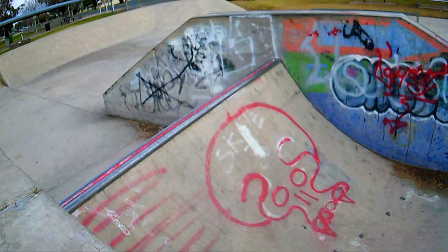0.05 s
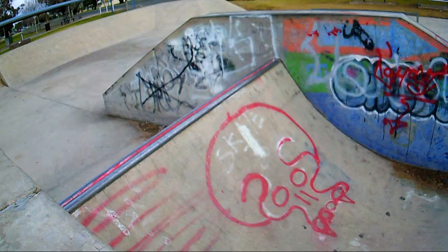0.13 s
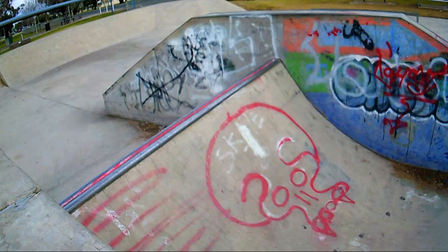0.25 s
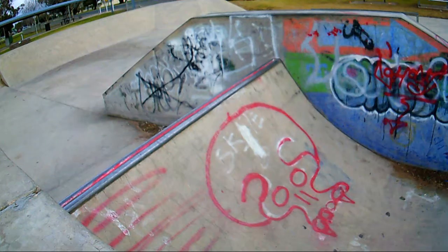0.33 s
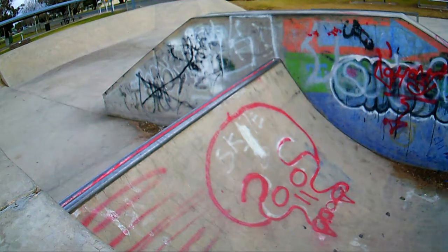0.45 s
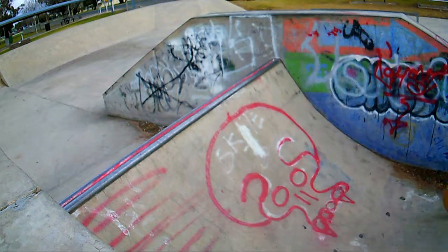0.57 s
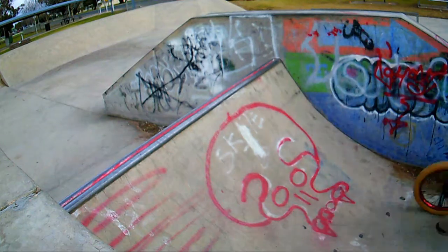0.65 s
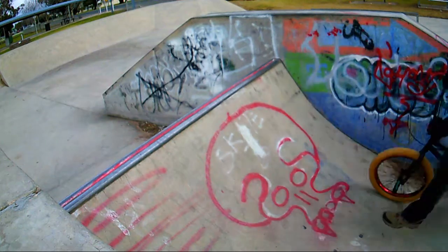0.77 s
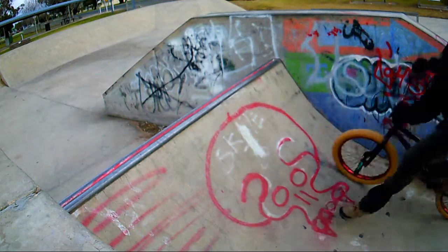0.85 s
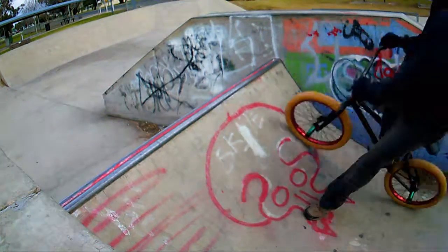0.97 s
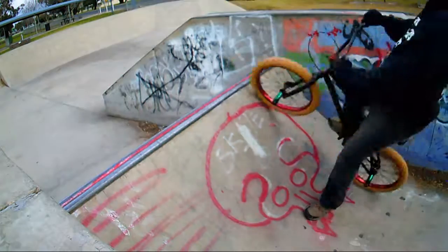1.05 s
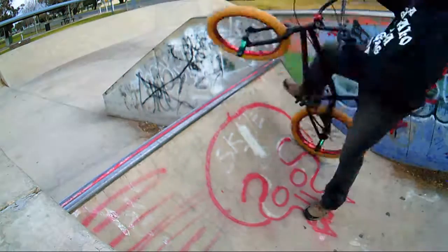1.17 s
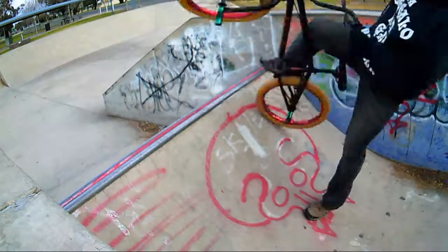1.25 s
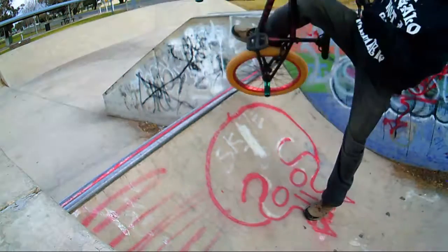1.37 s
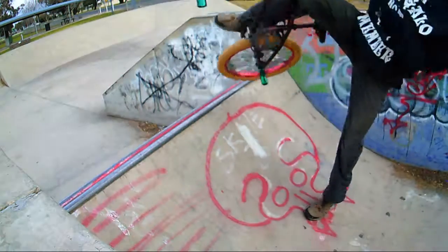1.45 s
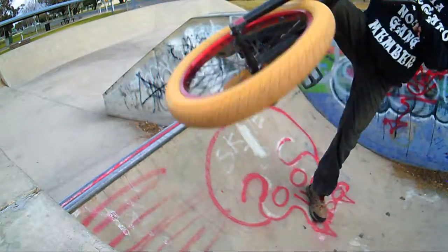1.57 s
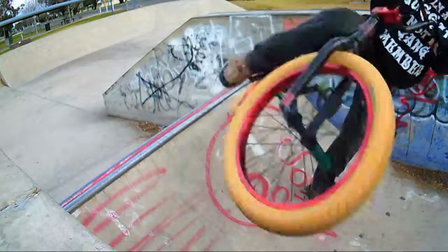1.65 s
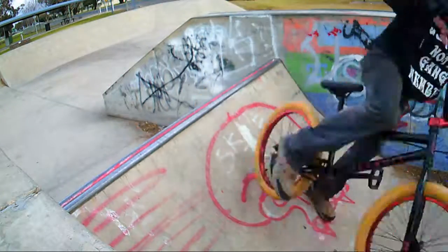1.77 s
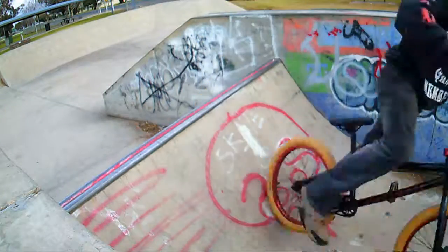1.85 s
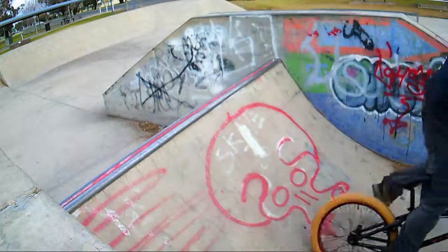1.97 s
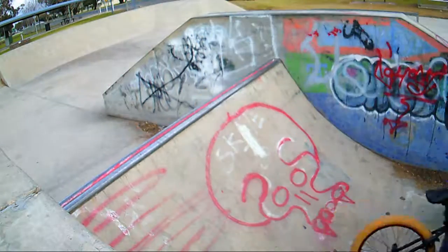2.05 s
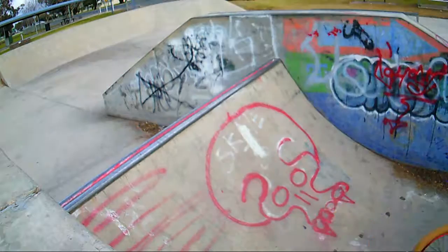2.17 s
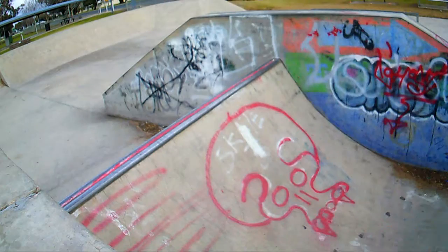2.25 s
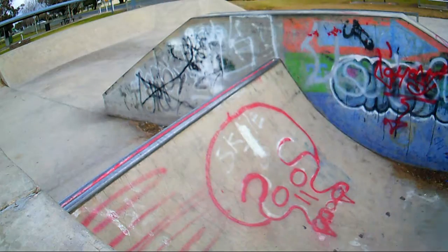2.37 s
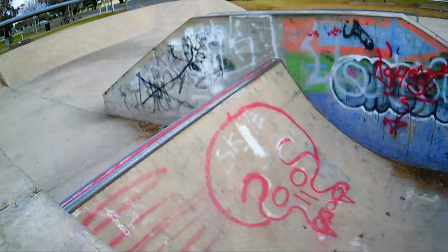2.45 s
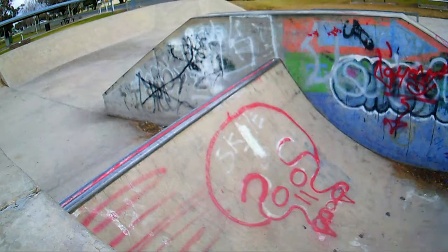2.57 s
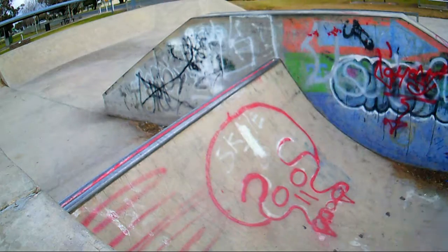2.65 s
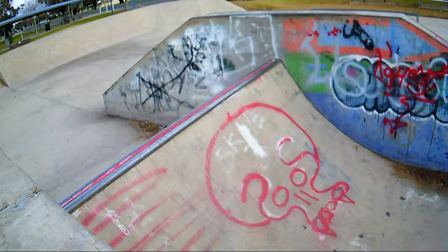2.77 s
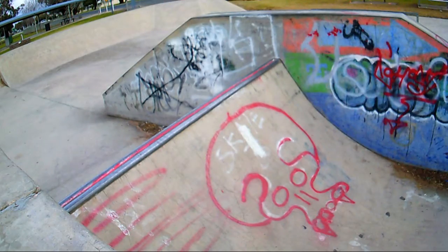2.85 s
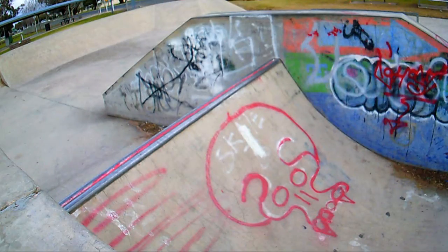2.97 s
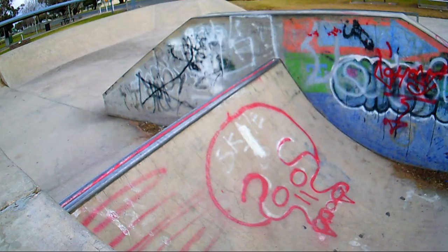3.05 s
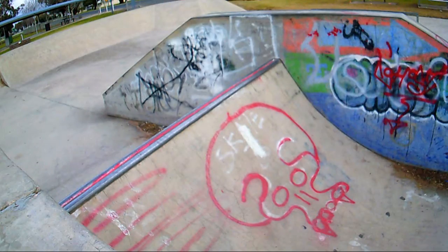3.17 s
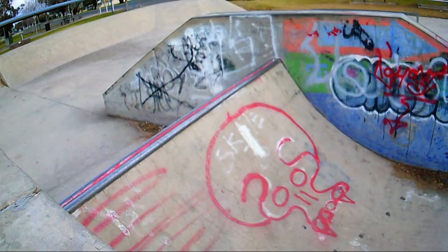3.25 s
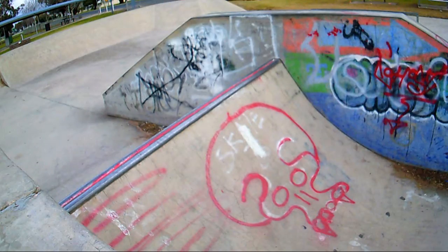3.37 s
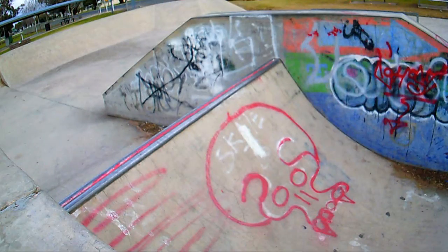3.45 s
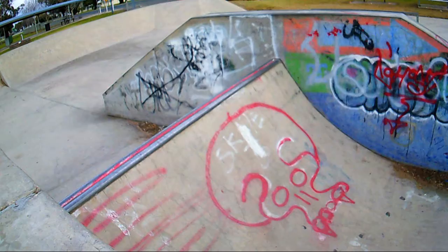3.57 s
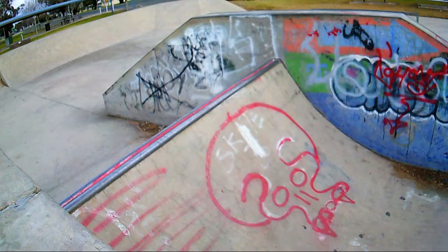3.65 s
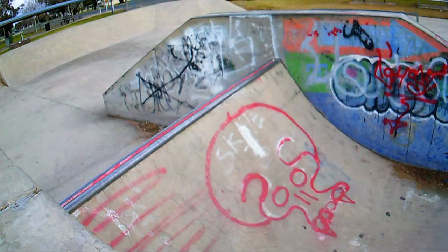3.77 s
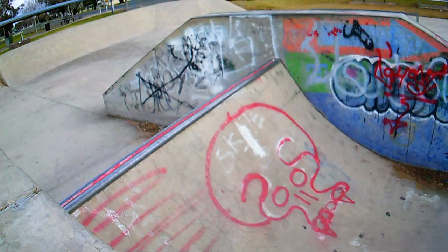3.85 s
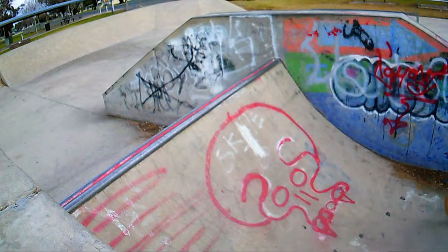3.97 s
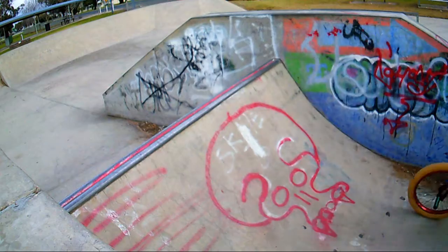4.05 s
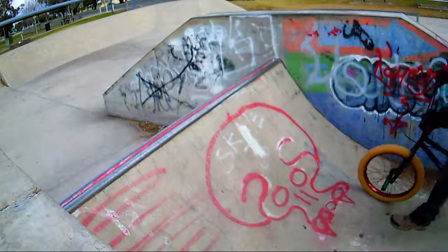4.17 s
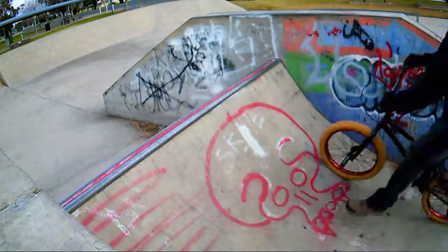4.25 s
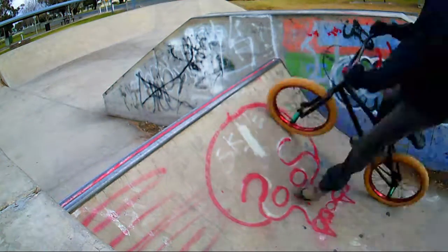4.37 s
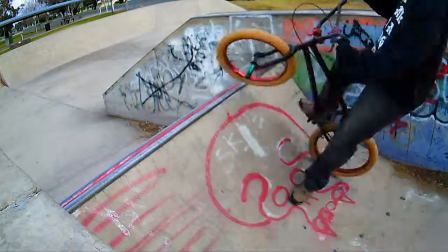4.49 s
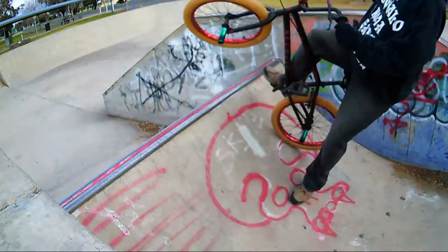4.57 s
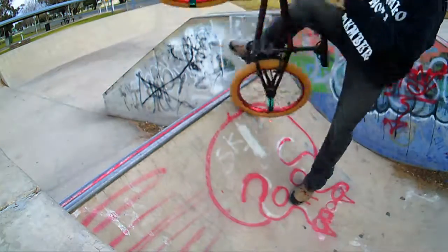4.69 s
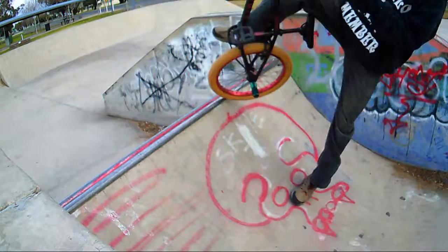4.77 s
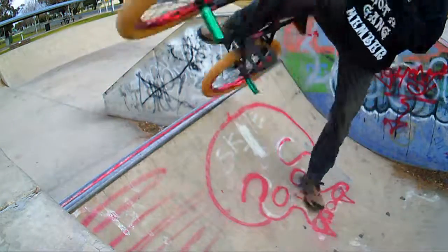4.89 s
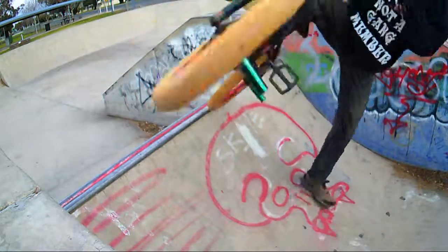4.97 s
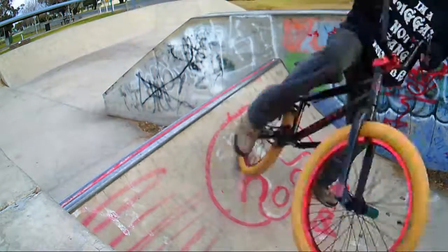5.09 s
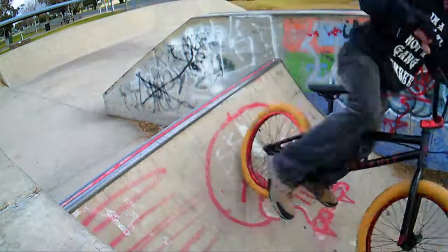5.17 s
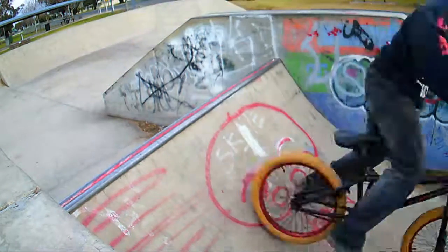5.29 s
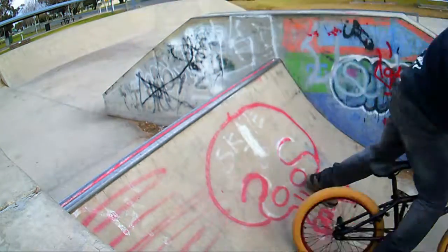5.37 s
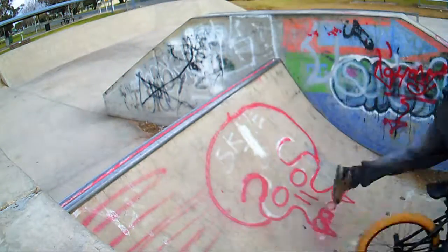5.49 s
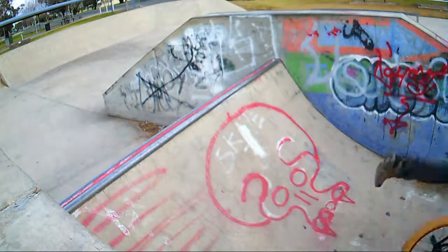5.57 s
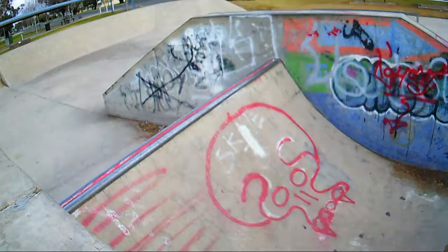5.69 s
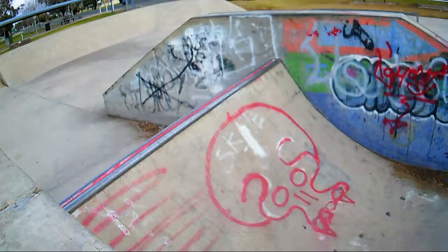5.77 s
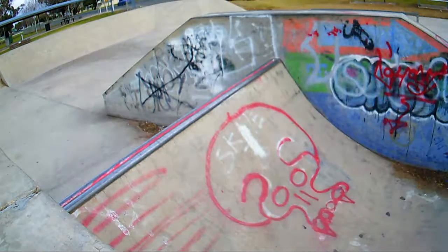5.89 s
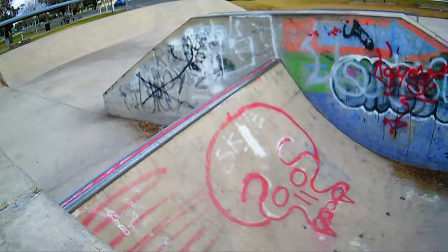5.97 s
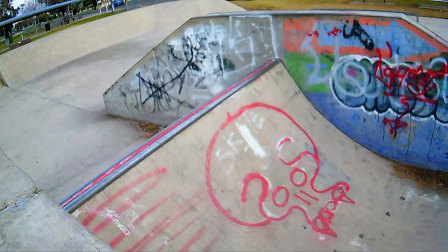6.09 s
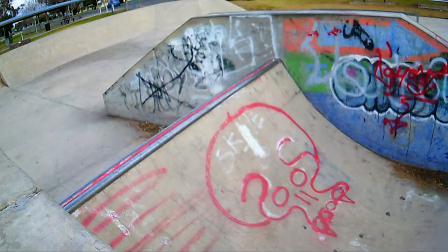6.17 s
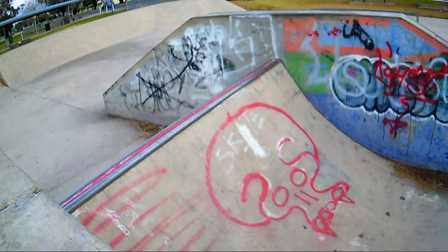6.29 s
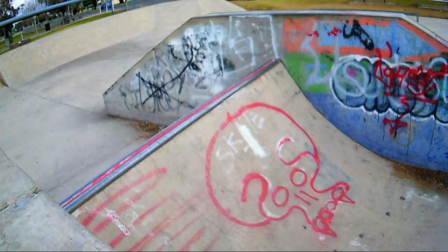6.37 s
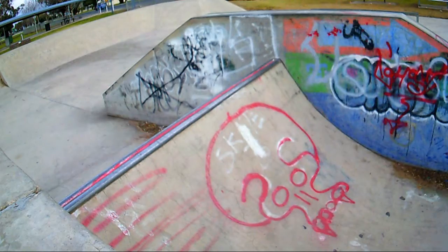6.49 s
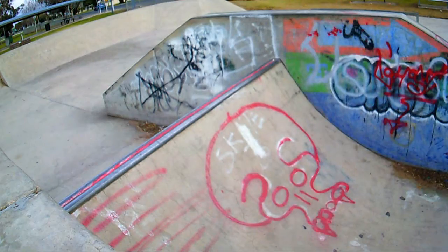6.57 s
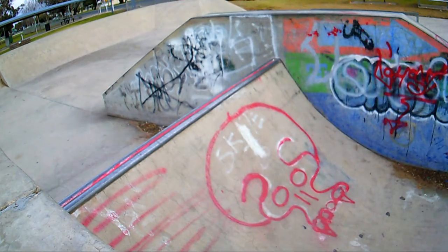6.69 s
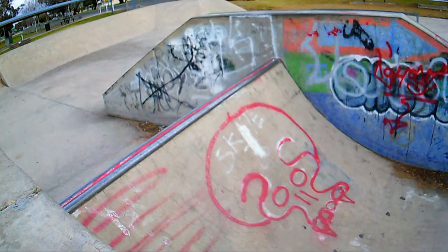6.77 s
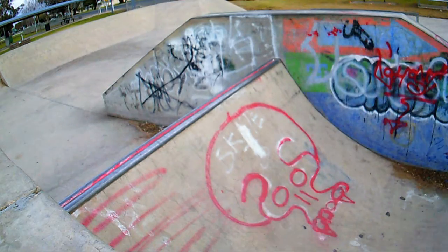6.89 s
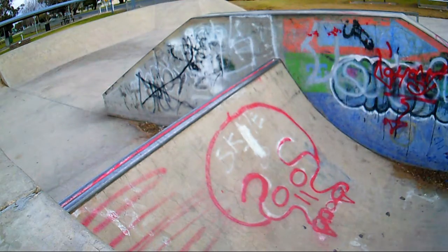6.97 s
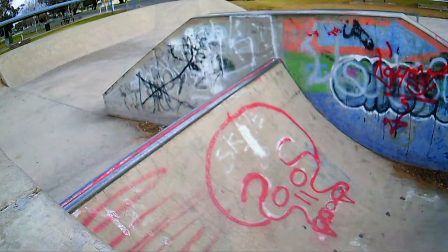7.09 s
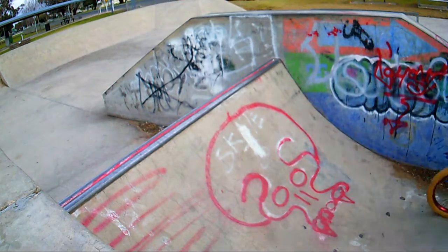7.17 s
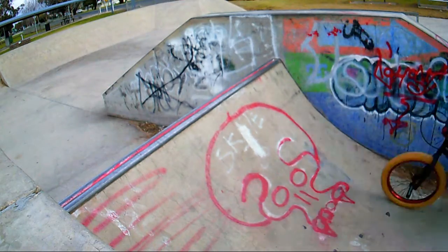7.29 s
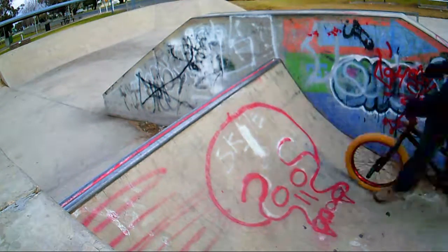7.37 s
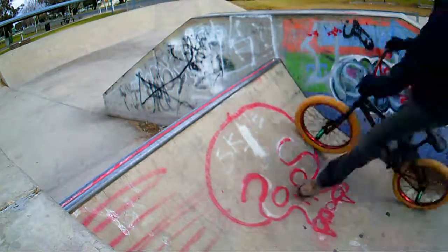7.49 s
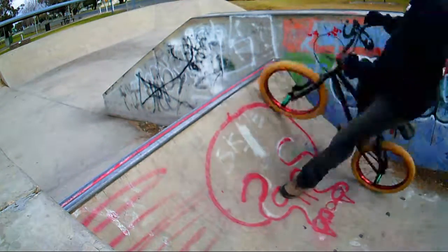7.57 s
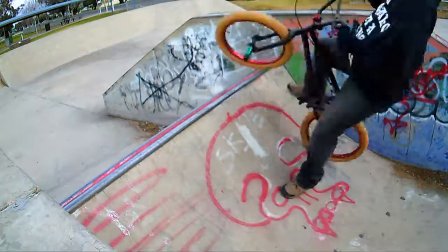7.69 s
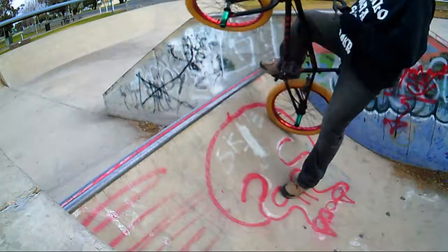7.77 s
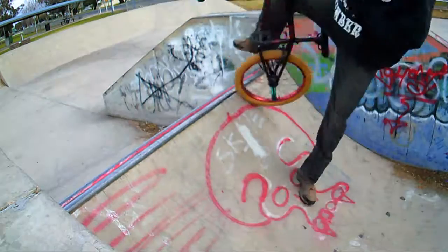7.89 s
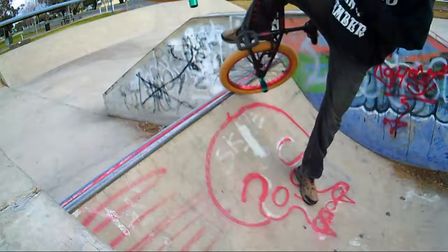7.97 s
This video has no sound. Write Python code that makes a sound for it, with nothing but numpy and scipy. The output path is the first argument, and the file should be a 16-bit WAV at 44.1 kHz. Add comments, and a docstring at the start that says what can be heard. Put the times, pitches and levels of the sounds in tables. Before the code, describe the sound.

A low hum of distant traffic and engines runs throughout. Close by, BMX tyres rush in on concrete at about 0.7 seconds, the freewheel ticking faster. A shoe slaps and scuffs the ramp around 1 second, and the ticking slows with the wheel in the air. Near 1.9 seconds the bike lands with booming tyres and a rattling frame and chain, gives a hard double clack at 2.2, and coasts away. At 3.1 the road is abruptly louder, an engine droning and climbing until about 5.3. The bike returns at 4.2, with dull foot knocks from 4.4 to 5, then lands with a rattle and boom between 5.1 and 5.4 and ticks away. The road hum drops at 6.6. A third approach at 7.4 brings a shoe slap, a faint squeak and a short foot thud near 7.9. The concrete bowl gives the bike a brief echo.

```python
"""Over a low road hum, BMX tyres rush in on concrete and a freewheel ticks faster: three tries at a foot plant.
Each time a shoe slaps and scuffs the ramp while the ticking slows with the wheel in the air. Twice the bike
lands, its frame rattling and its tyres booming, and coasts away; the third try ends on a short foot thud. The
concrete bowl gives the bike a brief echo. Engines pull away on the road behind; the background steps up
abruptly at 3.1 s and down again at 6.6 s."""
import sys
import numpy as np
from scipy import signal
from scipy.fft import rfft, irfft, next_fast_len
from scipy.io import wavfile
from scipy.ndimage import uniform_filter1d, map_coordinates

SR = 44100
rng = np.random.default_rng(int(sys.argv[2]) if len(sys.argv) > 2 else 0)


def unload_audio(sound):
    """Save the sound as a 16-bit wav file, at the path given as the first command line argument."""
    columns = np.transpose(np.atleast_2d(sound))
    # keep every value between -1 and 1, then stretch to whole-number steps
    steps = np.round(np.clip(columns, -1, 1) * 32767)
    wavfile.write(sys.argv[1], SR, steps.astype(np.int16))


N = 354563
TIME = np.arange(N) / SR
HIT_TIME = TIME[:SR // 2]

# A wheel comes down: start_s, level_db, slam_offset_db, brightness_db,
# rebound_gap_s, rebound_count, loss_per_rebound_db
WHEEL_DROPS = [(1.8541, -30, 0, 1, 0.043, 1, 2.5), (1.9484, -24, -4, -0.5, 0.03, 2, 6),
               (5.127, -31.5, -4, -0.5, .045, 2, 12), (5.352, -24, -10, -.5, 0.034, 3, 5)]
def landings(slam_delay_s=.007):
    """The tyre touches, the frame slams and shudders on, and the bike rebounds, weaker each time."""
    # tone of each stage: thud_db, body_db, snap_db, steel_db
    touch, slam = [-5.5, -1, -17, -34.5], [2.5, -0.5, -9.5, -33.5]
    shudder, rebound = [-5, -15, -27.5, -43.5], [3, 1.5, -10, -28]
    out = np.zeros(N)
    for start_s, level_db, slam_db, bright_db, gap_s, count, loss_db in WHEEL_DROPS:
        band_db = level_db + np.array([0, 0, bright_db, bright_db])
        add(out, start_s, blow(band_db + touch, t60_s=.11, crack=10))
        add(out, start_s + slam_delay_s, blow(band_db + slam_db + slam, t60_s=.1))
        add(out, start_s + slam_delay_s, blow(band_db + shudder, t60_s=.44, ring_db=1))
        for k in range(1, round(count) + 1):
            add(out, start_s + k * gap_s, blow(band_db - k * loss_db + rebound, t60_s=.1))
    return out


# The thud, body, snap and loose steel of a blow: low_hz, high_hz
BLOW_BANDS = [(130, 450), (450, 1800), (1800, 4200), (4800, 13000)]
# Tone of the shaken frame: frequency_hz, gain_db
FRAME_EQ = [(100, -6.5), (170, 0.5), (235, -2), (345, 2), (470, -4.5), (590, 2), (690, -1), (810, 2.5),
            (1300, -4), (1900, -20), (2500, -23), (3700, -35.5), (6000, -43.5), (13000, -54.5)]
# Ringing spokes, chain and frame tubes: pitch_hz, level_db, t60_s
STEEL_MODES = [(2330, 1.5, .12), (2760, 5, 0.12), (3150, -1.5, .13), (3160, 0.5, 0.12), (3560, 2, 0.086),
               (3820, 5, 0.088), (5540, -11.5, .14), (5930, -13.5, .14), (6300, -15, .14)]
def blow(band_db, t60_s, crack=8, ring_db=0):
    """A sharp contact, then a dying chatter of loose parts through the frame; one level per band."""
    clumps = amp(3 * np.repeat(rng.standard_normal(len(HIT_TIME) // 63), 63))  # tiny rebounds
    force = rng.standard_normal(len(HIT_TIME)) * clumps * decay(HIT_TIME, t60_s)
    force[0] += crack
    shake = colour(force, FRAME_EQ)
    out = np.zeros(len(HIT_TIME))
    for band_hz, level_db in zip(BLOW_BANDS, band_db):
        part = signal.sosfilt(signal.butter(3, band_hz, 'band', fs=SR, output='sos'), shake)
        out += amp(level_db) * part / np.std(part[:SR // 40])  # the first 25 ms set the level
    add(out, 0, amp(band_db[-1] + ring_db) * ring(STEEL_MODES, scatter_db=1))
    return out


# Tyres on landing, and a short foot thud at the end: start_s, level_db, pitch_hz, t60_s
LOW_BOOMS = [(1.861, -25, 99, .28), (1.958, -15.5, 172.5, 0.12), (1.987, -15.5, 95.6, 0.42),
             (2.195, -23.5, 88, 0.23), (5.366, -18.5, 107, 0.13), (5.388, -15.5, 99, 0.62),
             (7.931, -24.5, 214, 0.091)]
def booms(attack_s=.0013):
    """Each impact rings one low, dying tone, like a slack drum."""
    out = np.zeros(N)
    for start_s, level_db, pitch_hz, t60_s in LOW_BOOMS:
        envelope = fade_in(HIT_TIME, attack_s) * decay(HIT_TIME, t60_s)
        add(out, start_s, amp(level_db) * envelope * np.sin(2 * np.pi * pitch_hz * HIT_TIME))
    return out


# A hard double clack as the bike rolls away: start_s, level_db, lowpass_hz
CLACK_HITS = [(2.1745, -14, 800), (2.1899, -11, 1800), (2.1918, -16.5, 2100)]
# The short ring of a clack: pitch_hz, level_db, t60_s
CLACK_RING = [(386, -3.5, 0.058), (595, -3, 0.023), (713, -2, 0.027), (1080, 0.5, 0.023),
              (1174, -2.5, 0.036), (1624, -10, 0.035), (2900, -40, .02)]
def clacks(attack_s=.0004, chatter_gain=.2):
    """Hard contacts ring a few short modes; the first clack is duller, the second brighter."""
    out = np.zeros(N)
    for start_s, level_db, lowpass_hz in CLACK_HITS:
        tone = ring(CLACK_RING, scatter_db=.5)
        t = HIT_TIME[:len(tone)]
        chatter = unit(colour(rng.standard_normal(len(t)), FRAME_EQ)) * decay(t, t60_s=.065)
        clack = (tone + chatter_gain * chatter) * fade_in(t, attack_s)
        add(out, start_s, amp(level_db) * signal.lfilter(*signal.butter(2, lowpass_hz, fs=SR), clack))
    return out


# Shoe and bike knock on the concrete: start_s, body_db, thud_db, t60_s
DULL_KNOCKS = [(1.005, -44.5, -34, 0.058), (1.261, -45, -51, 0.048), (1.57, -43.5, -36, .084),
               (2.076, -44, -42, 0.13), (2.191, -25.5, -44, 0.048), (4.446, -36, -36, 0.07),
               (4.816, -37.5, -34.5, .05), (5.013, -35.5, -36, .035), (6.405, -47, -37, .12),
               (7.5564, -34, -31.5, 0.054), (7.616, -46.5, -38, .075), (7.93, -38.5, -38.5, 0.065)]
def knocks(snap_offset_db=-18, steel_offset_db=-46):
    """Rubber contacts land dull, with little treble."""
    out = np.zeros(N)
    for start_s, body_db, thud_db, t60_s in DULL_KNOCKS:
        band_db = [thud_db, body_db, body_db + snap_offset_db, body_db + steel_offset_db]
        add(out, start_s, blow(band_db, t60_s))
    return out


# Chain clinks: start_s, steel_db
CHAIN_HITS = [(2.019, -64.5), (2.089, -67.5), (5.174, -70), (5.287, -65.5), (5.418, -66)]
def chain_clinks():
    """The chain flicks the frame: a small, bright blow."""
    tone_db = np.array([16.5, 8, 9.5, 0])  # thud, body, snap, steel
    out = np.zeros(N)
    for start_s, steel_db in CHAIN_HITS:
        add(out, start_s, blow(steel_db + tone_db, t60_s=.035))
    return out


# Tone of rubber rolling on gritty concrete: frequency_hz, gain_db
TYRE_EQ = [(60, -10.5), (200, 3.5), (330, -3), (500, 0), (1200, -1), (1800, -16.5), (2400, -18.5),
           (3400, -28.5), (5000, -37.5), (9000, -41.5), (13000, -58)]
def tyres(grains_per_s=700):
    """Rubber rushes over the concrete, with sharp grains of grit in the rush."""
    grains = rng.standard_normal(N) * (rng.random(N) < grains_per_s / SR)
    contact = rng.standard_normal(N) + 0.76 * unit(grains)
    return amp(rolling_level() + 1.8 * wobble(35)) * unit(colour(contact, TYRE_EQ))


TOUCHDOWN_DB_PER_S = 105.5  # how fast tyres and hub swell into a landing
# Rides up the ramp: start_s, lift_off_s, tyre_db, hub_db, distant_hub_db, lift_off_ticks_per_s
RIDES_UP = [(.72, 1.08, -52, -74, -93, 63), (4.198, 4.519, -52.5, -74.5, -88, 72),
            (7.38, 7.619, -49.5, -75.5, -82.5, 68)]
# Rides down and away: touchdown_s, off_ramp_s, tyre_db, hub_db, hub_fade_db_per_s
RIDES_DOWN = [(1.901, 2.46, -45.5, -78.5, 4), (5.198, 5.66, -48.5, -72.5, 16.5)]
def rolling_level():
    """Tyre level in dB: it swells on approach, fades at lift-off and returns with the landing."""
    up = [db + swell(start_s, lift_s, rise_db_per_s=44, fall_db_per_s=41)
          for start_s, lift_s, db, *_ in RIDES_UP]
    away = [db + swell(down_s, gone_s, TOUCHDOWN_DB_PER_S, fall_db_per_s=55.5)
            for down_s, gone_s, db, *_ in RIDES_DOWN]
    return np.max(up + away, axis=0)


def hub_motion(roll_in_s=.7, air_s=.7, air_db=-5, spin_down_s=.12):
    """Tick rate and level: the wheel speeds up, spins down in the air and slows as it coasts away."""
    roll_in_rate, idle_rate, away_rate = 42, 24, 41  # ticks per s
    speed_up, slow_down = 48, 13  # ticks per s, each second
    rates, levels = [], []
    for start_s, lift_s, _, hub_db, distant_db, top_rate in RIDES_UP:
        heard_s = start_s - roll_in_s
        coming = np.maximum(top_rate - speed_up * (lift_s - TIME), roll_in_rate * (TIME > heard_s))
        flying = idle_rate + (top_rate - idle_rate) * np.exp(-np.abs(TIME - lift_s) / spin_down_s)
        rates.append(np.where(TIME < lift_s, coming, flying))
        stages = [(heard_s, start_s, distant_db), (start_s, lift_s, hub_db),
                  (lift_s, lift_s + air_s, hub_db + air_db)]
        for begin_s, end_s, level_db in stages:
            levels.append(level_db + swell(begin_s, end_s, rise_db_per_s=46.5, fall_db_per_s=55.5))
    for down_s, gone_s, _, hub_db, fade_db_per_s in RIDES_DOWN:
        rates.append((TIME > down_s) * (away_rate - slow_down * (TIME - down_s)))
        levels.append(hub_db + swell(down_s, gone_s, TOUCHDOWN_DB_PER_S, fade_db_per_s))
    return np.max(rates, axis=0), np.max(levels, axis=0)


# The ping of a steel pawl: pitch_hz, level_db, t60_s
PAWL_MODES = [(3000, -4, 0.022), (3650, 4, 0.0064), (4130, 2.5, 0.0049), (4610, 0, 0.014),
              (5850, -12, 0.0099), (7440, -18, .012), (8450, -10, 0.0079)]
def freewheel(scatter_db=2.5, variants=5):
    """The steel pawls drop once per tooth in an even ratchet, faster with wheel speed."""
    ticks_per_s, level_db = hub_motion()
    teeth_passed = np.floor(np.cumsum(ticks_per_s * amp(.2 * wobble(25))) / SR)
    teeth = np.diff(teeth_passed, prepend=0)
    drops = teeth * amp(scatter_db * np.clip(rng.standard_normal(N), -1, 1))
    onset = fade_in(HIT_TIME, attack_s=.0015)  # each tick starts softly
    variant = np.cumsum(teeth) % variants  # no two teeth in a row ring alike
    pings = [ring(PAWL_MODES, scatter_db=2) for _ in range(variants)]
    ticks = sum(signal.oaconvolve(drops * (variant == k), ping * onset[:len(ping)])[:N]
                for k, ping in enumerate(pings))
    # each pawl chatters for an instant as it seats
    seating = signal.oaconvolve(drops, onset * decay(HIT_TIME, t60_s=.022))[:N]
    chatter = seating * noise([(1500, -24), (4000, 2.0), (6000, -7.5), (8300, -9.5), (12000, -29)])
    return amp(level_db) * unit(unit(ticks) + unit(chatter))


# Soles, tyres and clothing brush; rubber squeaks on concrete: peak_s, level_db, half_width_s
SCUFF_STROKES = [(.963, -42, 0.011), (1.529, -48, .032), (1.678, -48, 0.02), (2.25, -45.5, .018),
                 (2.345, -46.5, 0.038), (4.812, -49, 0.014)]
SQUEAK_STROKES = [(7.27, -58.5, .008), (7.855, -47.5, 0.011)]
# Tone of the midrange scuff and of the thinner squeak: frequency_hz, gain_db
SCUFF_EQ = [(400, -4), (800, 8), (1300, 8.5), (1900, 3.5), (2400, -5), (3400, -13.5), (4500, -26),
            (8000, -32.5), (13000, -49.5)]
SQUEAK_EQ = [(800, -25), (1500, 1.5), (1900, 4.5), (2350, 7), (2750, -5.5), (3500, -12), (4500, -22.5),
             (8000, -31), (13000, -44)]
def rubs(strokes, eq):
    """Brief rubs swell and fade, grainy with stick and slip."""
    envelope = sum(amp(level_db) * np.exp(-.5 * ((TIME - peak_s) / half_width_s) ** 2)
                   for peak_s, level_db, half_width_s in strokes)
    return envelope * amp(0.94 * wobble(250)) * noise(eq)


# Reverb time of the concrete bowl: frequency_hz, t60_s
BOWL_DECAY = [(100, 0.32), (1000, 0.75), (4000, 0.47), (12000, 0.13)]
def bowl_echo(sound):
    """The concrete banks return a short, diffuse echo."""
    hz, t, bands = signal.stft(rng.standard_normal(SR // 2), SR, nperseg=256)
    envelope = fade_in(t, attack_s=.0026) * decay(t, along(BOWL_DECAY, hz)[:, None])
    tail = signal.istft(bands * envelope, SR, nperseg=256)[1]
    return signal.fftconvolve(sound, tail / np.linalg.norm(tail))[:N]


# The road bed, stretch by stretch: start_s, hum_db, drone_db, rumble_db, hum_drift_db_per_s
ROAD_LEVELS = [(0, -52.3, -48, -34.8, .5), (3.113, -40, -42.5, -34, -0.83), (6.635, -48, -44, -33.5, 0.1)]
# Tone of its tyre hum, low drone and deep rumble: frequency_hz, gain_db
HUM_EQ = [(180, -34.5), (300, -7), (450, -2.5), (620, -2.5), (800, 1), (1180, 0.5), (1760, -12.5),
          (2100, -19.5), (2620, -32), (3080, -36.5), (3950, -50.5), (5140, -73)]
DRONE_EQ = [(50, -18), (90, -8), (130, -1.5), (200, -5), (300, -12.5), (450, -22), (900, -75)]
RUMBLE_EQ = [(10, -25.5), (22, -16.5), (33, 2.5), (48, -4), (80, -0.5), (100, -12.5), (140, -23),
             (400, -94.5)]
def road():
    """Distant tyres hum over a drone and a deep rumble, each wavering on its own."""
    stretches = np.array(ROAD_LEVELS)
    current = np.searchsorted(stretches[1:, 0], TIME)
    start_s, hum_db, drone_db, rumble_db, drift_db_per_s = stretches[current].T
    hum_db = uniform_filter1d(hum_db + drift_db_per_s * (TIME - start_s), size=700)
    hum = amp(hum_db + 1.8 * wobble(7)) * noise(HUM_EQ)
    drone = amp(drone_db + 1.5 * wobble(4.4)) * noise(DRONE_EQ)
    rumble = amp(rumble_db + 0.54 * wobble(2.6)) * noise(RUMBLE_EQ)
    return hum + drone + rumble


# Engines pulling away: start_s, end_s, pitch_hz, climb_hz_per_s,
# fader [(time_s, level_db)], orders [(pitch_multiple, level_db)]
ENGINE_PASSES = [(0, 3.115, 16.8, 0.5, [(0, -40), (3.115, -53.5)], [(2, 1), (5, -2.5)]),
                 (3.114, 5.35, 57.7, 8, [(3.12, -33), (3.23, -30.5), (3.61, -39.5), (3.68, -30.5),
                 (3.89, -28.5), (3.99, -44), (4.04, -31.5), (5.24, -40), (5.3, -54)], [(1, 0.5), (2, -15.5),
                 (3, -18)]), (5.4, 6.635, 26.7, 3, [(5.8, -47), (6.635, -43)], [(3, 6), (6, 0), (7, -8),
                 (8, -0.5), (9, -11)]), (6.636, 8.2, 32, 3, [(7.15, -37), (7.55, -34.5)], [(1, 3.5),
                 (2, -1.5), (4, -30)])]
def engines(waver_db=2):
    """Only the low firing orders of each engine carry this far; they climb as it gathers speed."""
    out = np.zeros(N)
    for start_s, end_s, pitch_hz, climb_hz_per_s, fader, orders in ENGINE_PASSES:
        phase = 2 * np.pi * np.cumsum(pitch_hz + climb_hz_per_s * np.maximum(TIME - start_s, 0)) / SR
        gate = uniform_filter1d(1. * ((TIME >= start_s) & (TIME <= end_s)), size=400)
        envelope = gate * amp(np.interp(TIME, *np.transpose(fader)))
        for multiple, order_db in orders:
            # the long path through moving air makes each order waver in level and phase
            gain = envelope * amp(order_db + waver_db * wobble(9))
            out += gain * np.sqrt(2) * np.sin(multiple * phase + .5 * wobble(7))
    return out


def amp(db):
    """Decibels to gain."""
    return 10 ** (np.asarray(db) / 20)


def unit(x):
    """x at rms 1."""
    return x / np.sqrt(np.mean(x ** 2) + 1e-20)


def along(points, hz):
    """Read (frequency_hz, value) points on a log frequency axis."""
    point_hz, values = np.transpose(points)
    return np.interp(np.log(hz + 1), np.log(point_hz + 1), values)


def wobble(knots_per_s):
    """A smooth random curve."""
    knots = rng.standard_normal(int(N * knots_per_s / SR) + 4)
    return map_coordinates(knots, [TIME * knots_per_s])


def fade_in(t, attack_s):
    """A rounded rise from 0 to 1."""
    return 1 - np.exp(-t / attack_s)


def decay(t, t60_s):
    """A fall of 60 dB in t60_s."""
    return np.exp(-np.log(1000) * t / np.maximum(t60_s, 1e-3))


def swell(start_s, end_s, rise_db_per_s, fall_db_per_s):
    """A fader move that rises to 0 dB at start_s, holds until end_s and falls again."""
    return -rise_db_per_s * np.maximum(start_s - TIME, 0) - fall_db_per_s * np.maximum(TIME - end_s, 0)


def ring(modes, scatter_db):
    """Damped modes, each struck with a random strength."""
    t = HIT_TIME[:SR // 4]
    return sum(amp(level_db + scatter_db * rng.normal()) * np.sin(2 * np.pi * hz * t) * decay(t, t60_s)
               for hz, level_db, t60_s in modes)


def colour(x, eq):
    """Minimum-phase EQ through (frequency_hz, gain_db) points: nothing rings ahead of a hit."""
    size = 2 * next_fast_len(len(x) // 2 + 4096)
    gain = amp(along(eq, np.fft.rfftfreq(size, 1 / SR)))
    cepstrum = irfft(np.log(gain + 1e-6))
    cepstrum[1:size // 2] *= 2
    cepstrum[size // 2 + 1:] = 0
    return irfft(rfft(x, size) * np.exp(rfft(cepstrum)), size)[:len(x)]


def noise(eq):
    """Coloured noise of rms 1."""
    return unit(colour(rng.standard_normal(N), eq))


def add(track, start_s, sound):
    """Mix a sound into the track at start_s."""
    part = track[round(start_s * SR):][:len(sound)]
    part += sound[:len(part)]


def scene(echo_db=-18.5):
    """The bike up close in its bowl, with the road behind."""
    bike = tyres() + freewheel() + knocks() + chain_clinks() + landings() + booms() + clacks()
    bike += rubs(SCUFF_STROKES, SCUFF_EQ) + rubs(SQUEAK_STROKES, SQUEAK_EQ)
    return (bike + amp(echo_db) * bowl_echo(bike) + road() + engines())[None]


# A small camera's hiss and its microphone's uneven treble: frequency_hz, gain_db
HISS_EQ = [(500, -5), (3500, 5), (5000, 0), (7000, -2), (8200, -9), (10000, -3.5), (12400, -26)]
MIC_EQ = [(3700, -2), (4800, -14.5), (6000, -7.5), (6900, -6.5), (8000, 0), (9300, -8), (10200, -11),
          (11300, -19.5), (12400, -3.5), (13000, -10)]
def record(dry, hiss_db=-79, top_hz=12900):
    """The camera adds faint hiss, colours the treble and keeps nothing above its band limit."""
    sound = colour(dry[0] + amp(hiss_db) * noise(HISS_EQ), MIC_EQ)
    size = next_fast_len(N + 8192)
    passband = np.fft.rfftfreq(size, 1 / SR) < top_hz
    return irfft(rfft(sound, size) * passband, size)[None, :N]


dry = scene()
out = record(dry)
unload_audio(out)
```